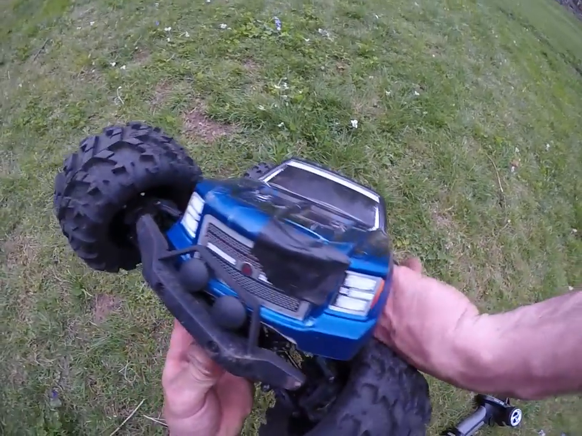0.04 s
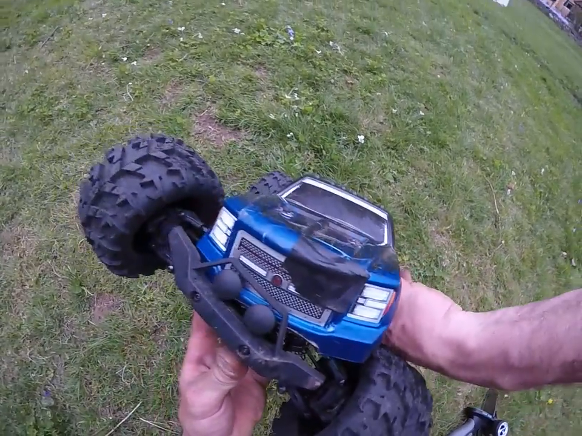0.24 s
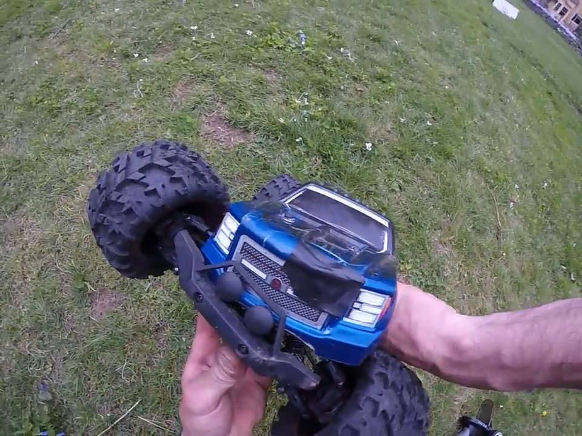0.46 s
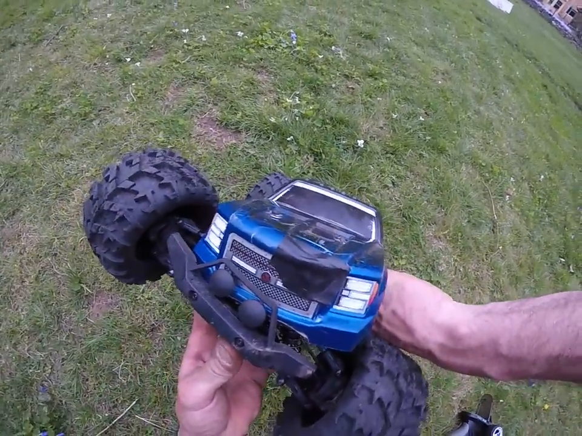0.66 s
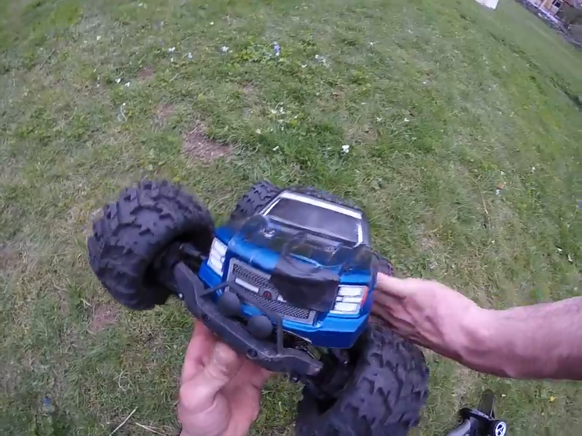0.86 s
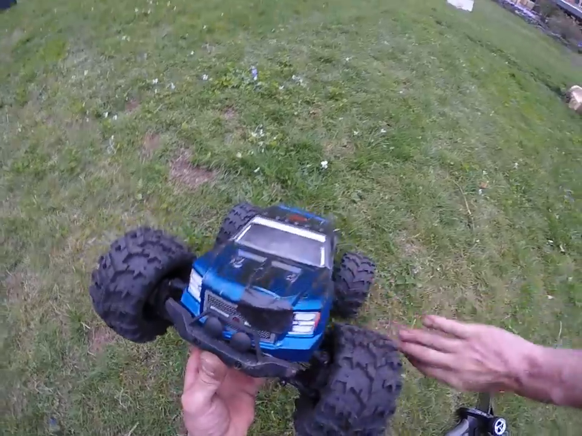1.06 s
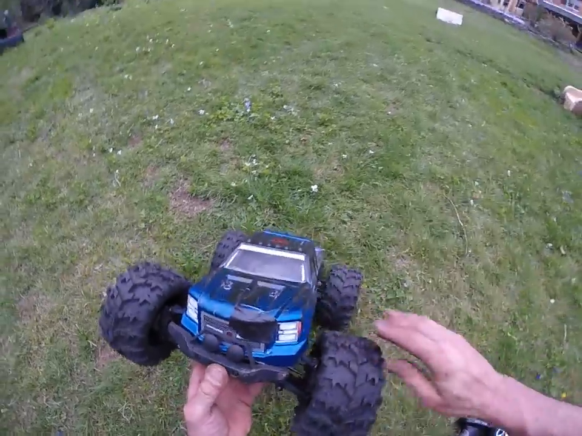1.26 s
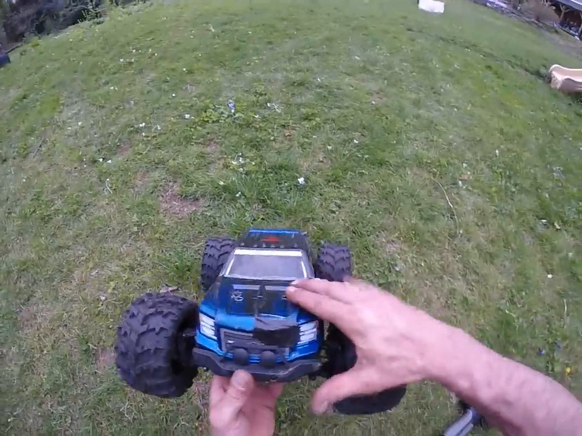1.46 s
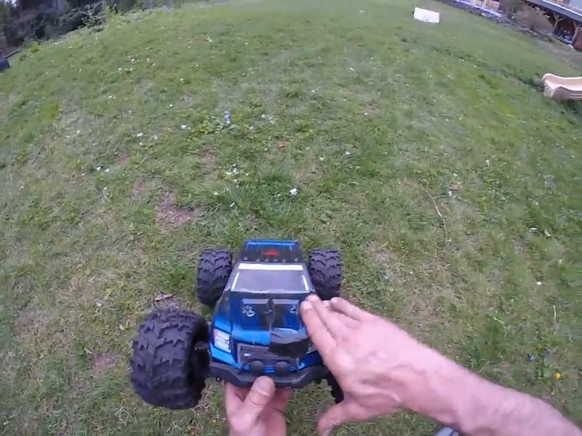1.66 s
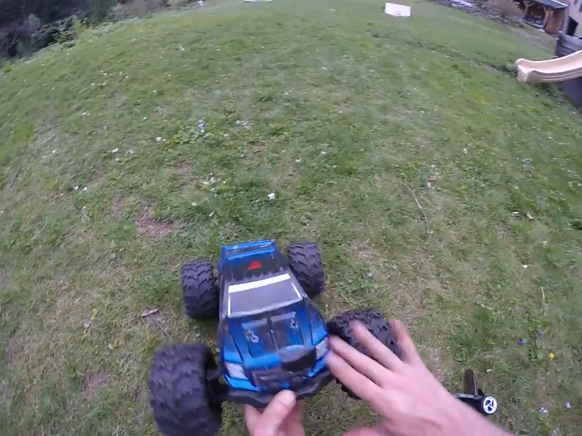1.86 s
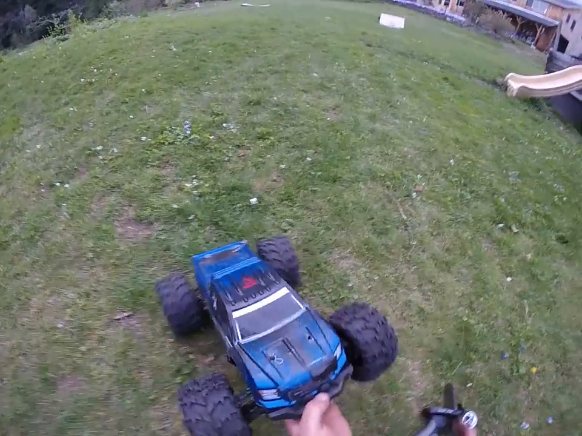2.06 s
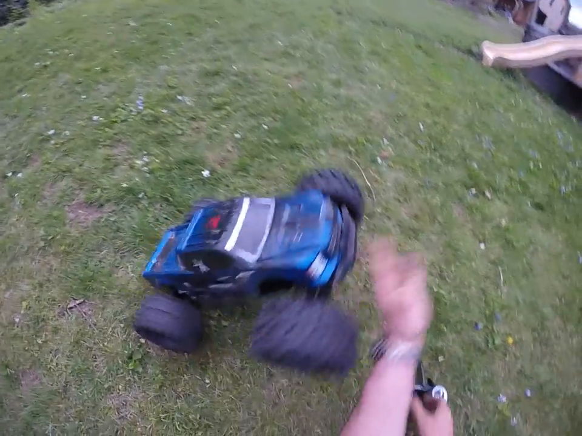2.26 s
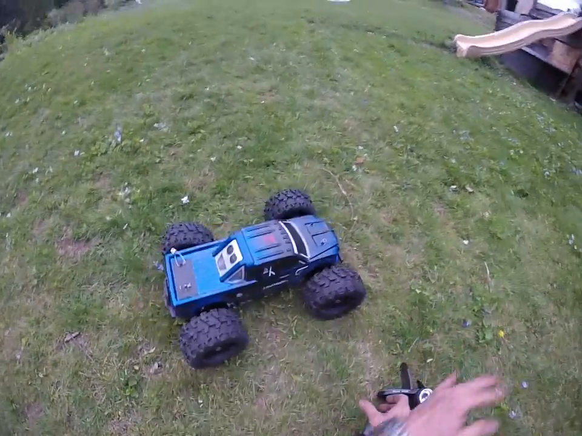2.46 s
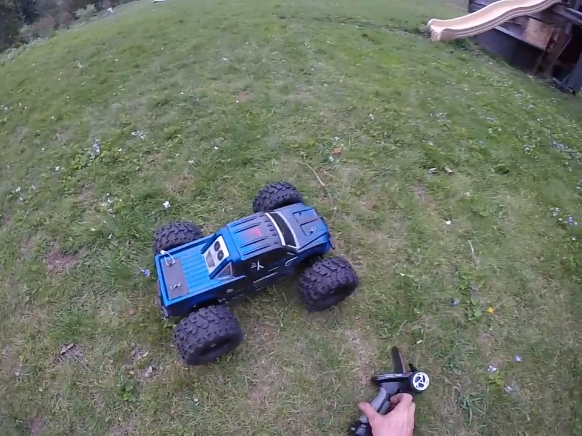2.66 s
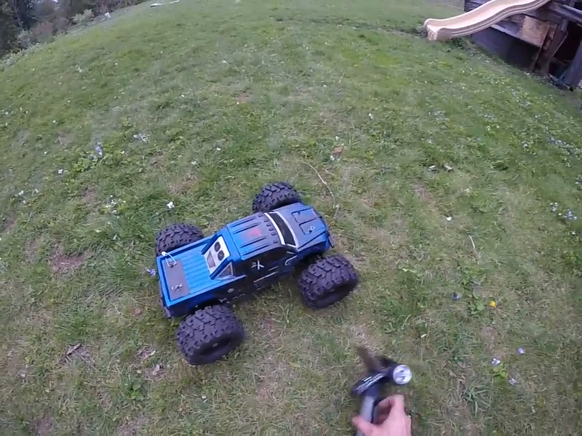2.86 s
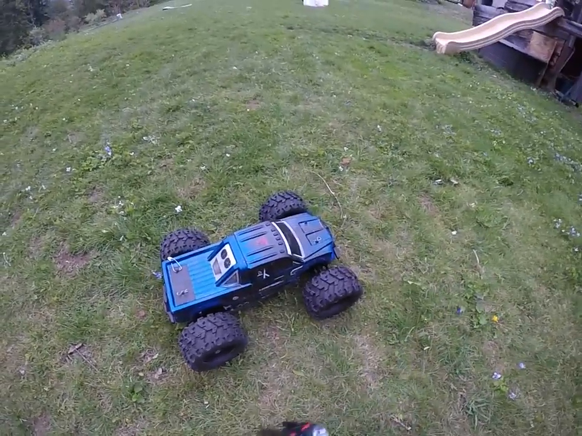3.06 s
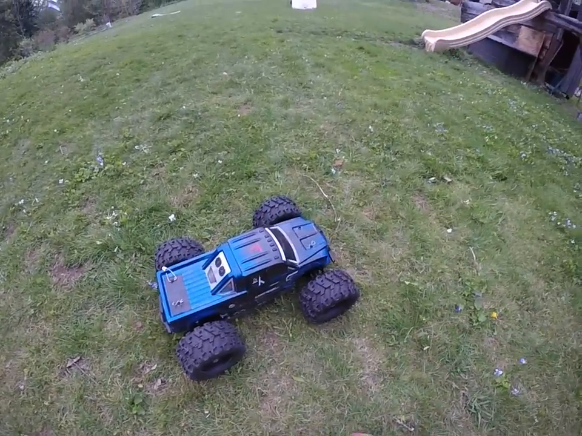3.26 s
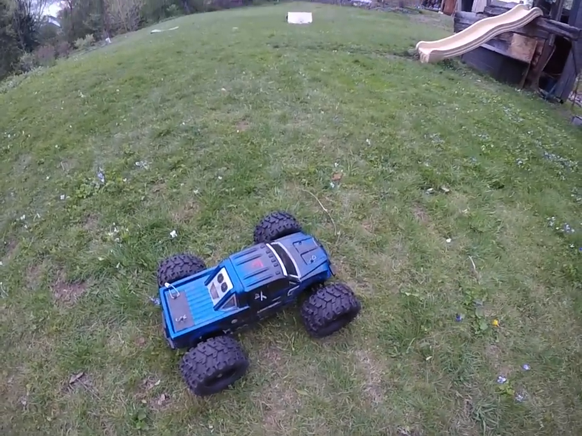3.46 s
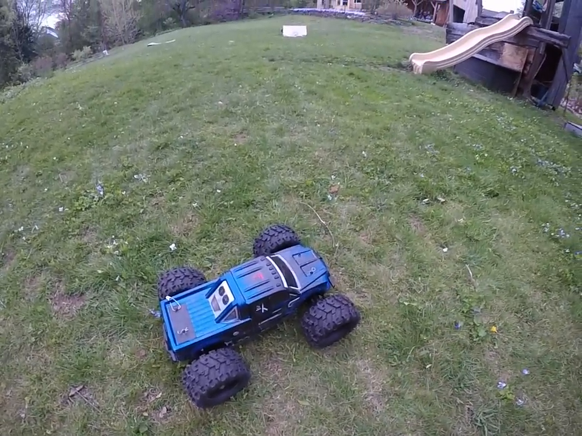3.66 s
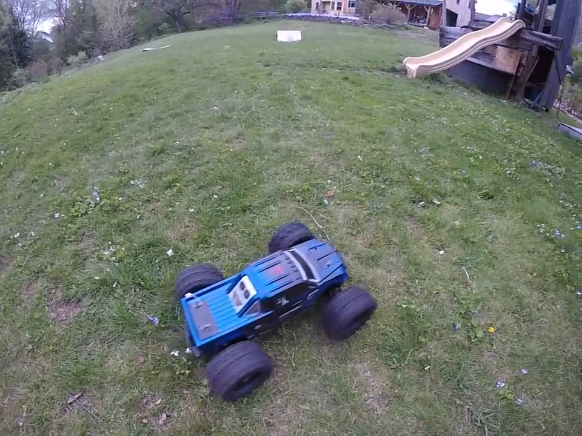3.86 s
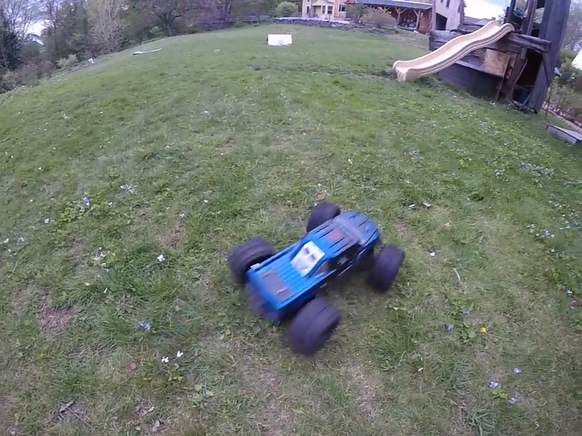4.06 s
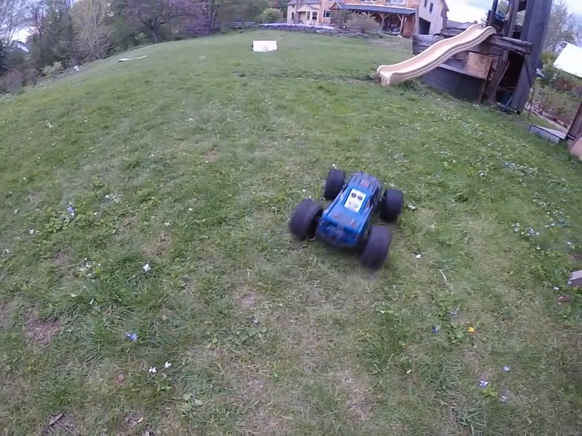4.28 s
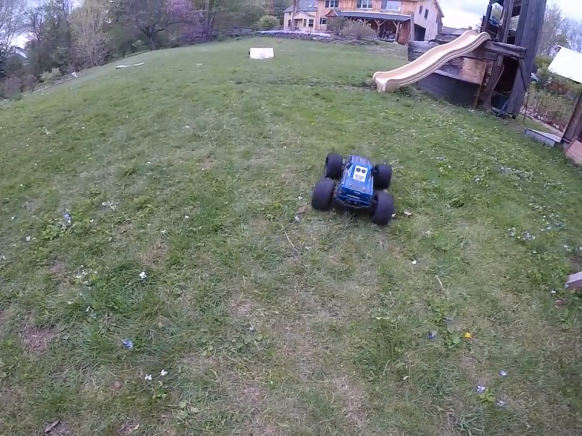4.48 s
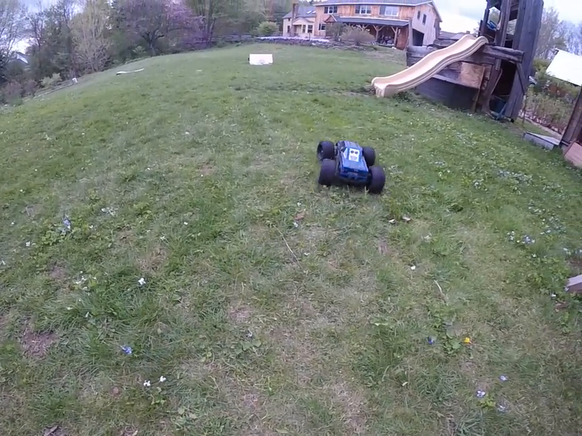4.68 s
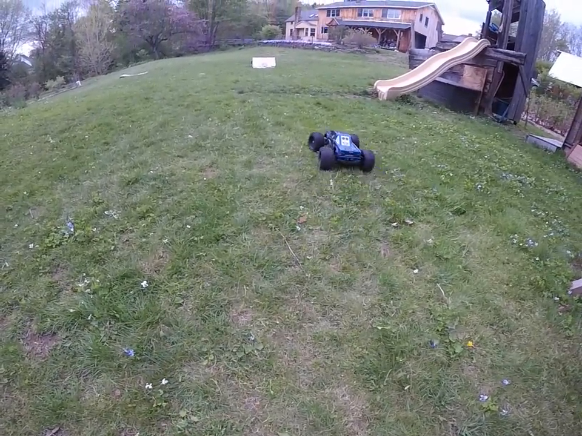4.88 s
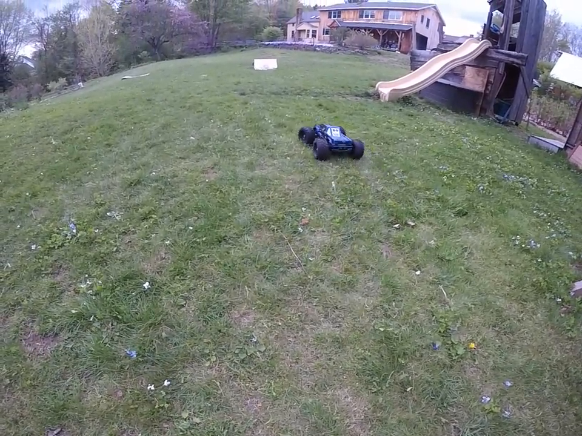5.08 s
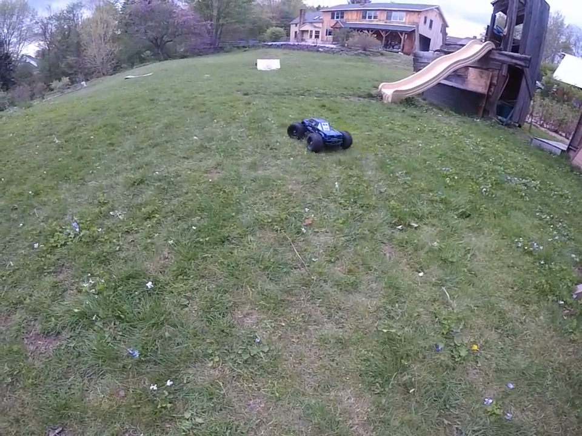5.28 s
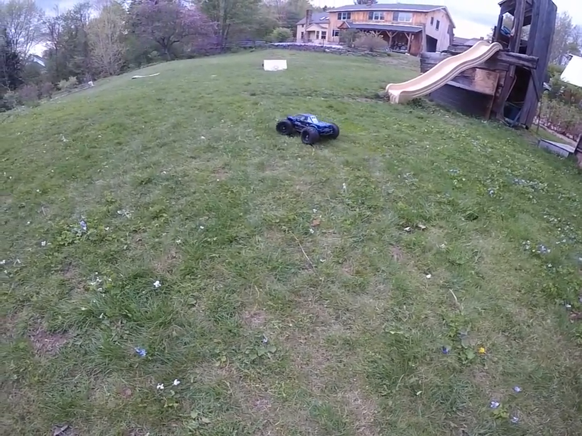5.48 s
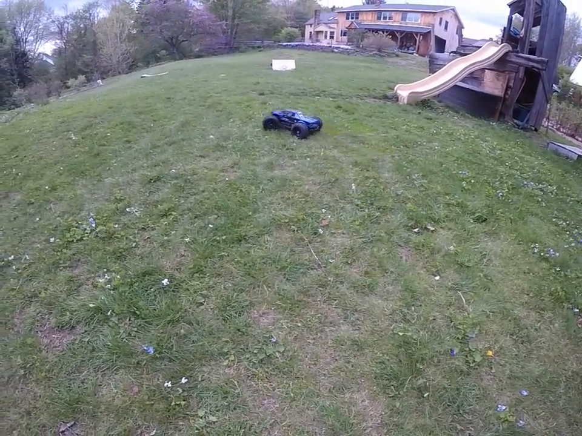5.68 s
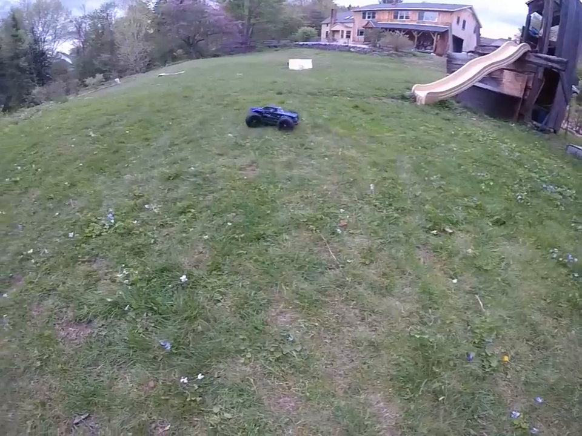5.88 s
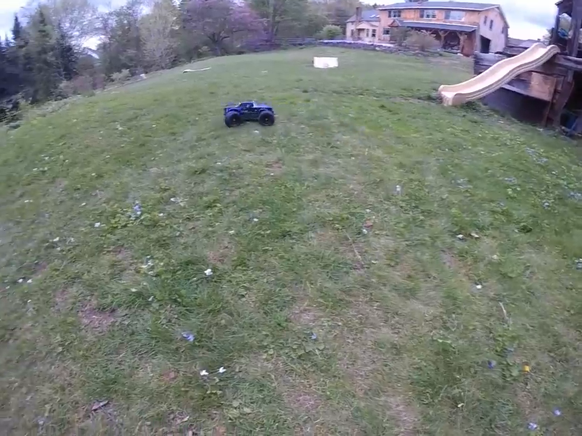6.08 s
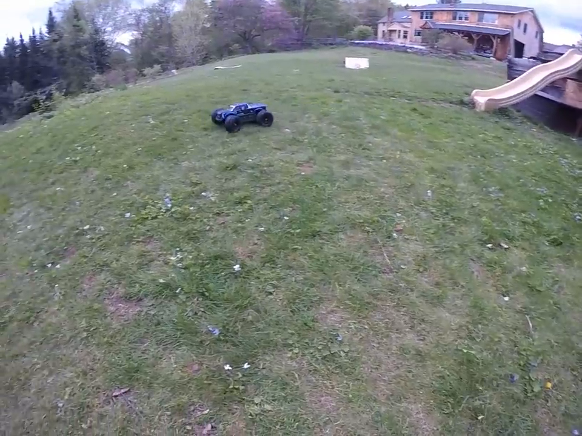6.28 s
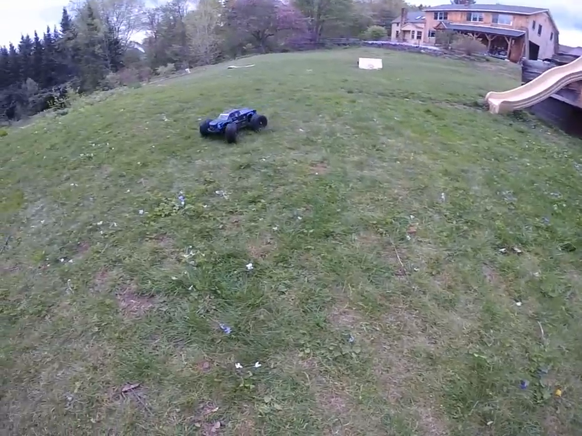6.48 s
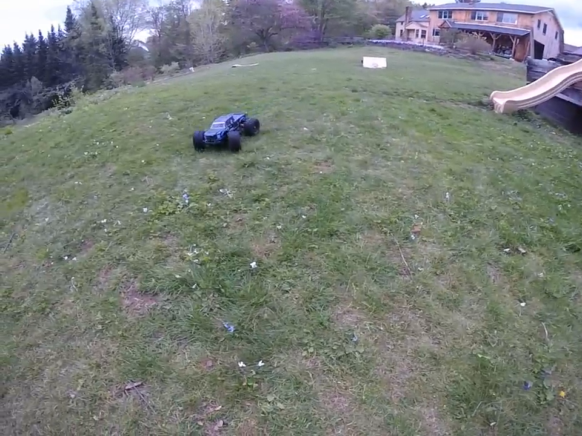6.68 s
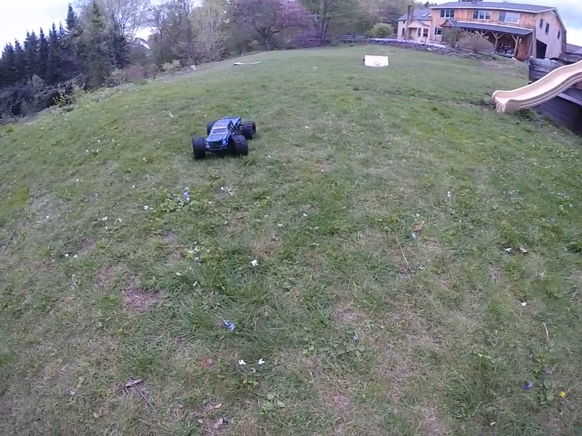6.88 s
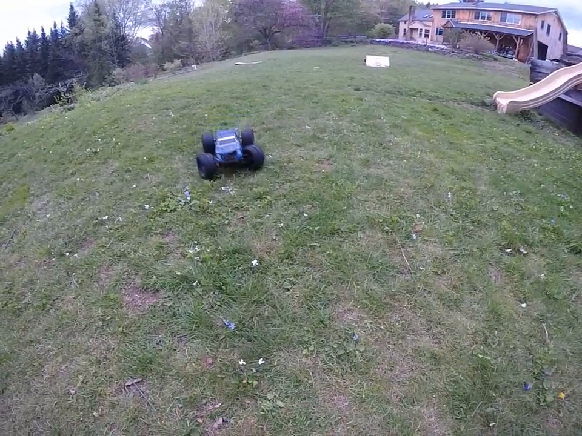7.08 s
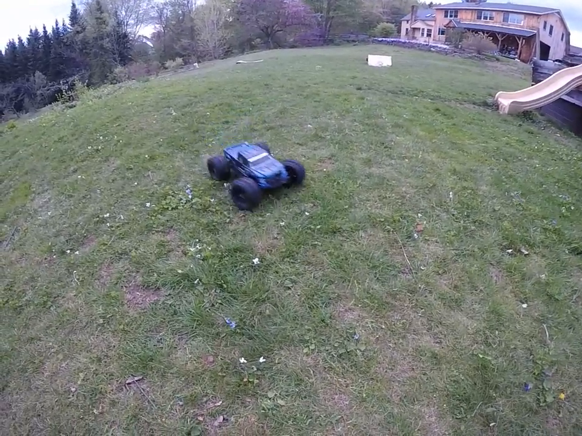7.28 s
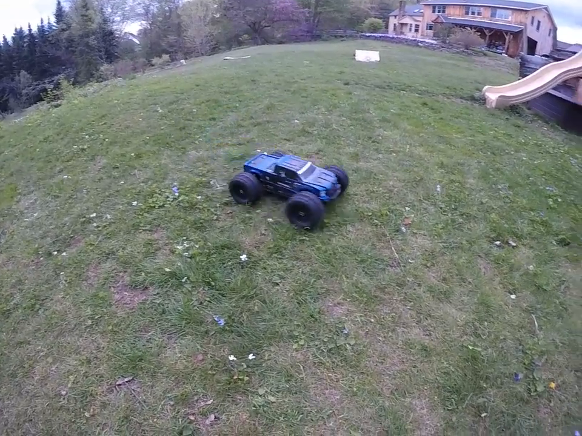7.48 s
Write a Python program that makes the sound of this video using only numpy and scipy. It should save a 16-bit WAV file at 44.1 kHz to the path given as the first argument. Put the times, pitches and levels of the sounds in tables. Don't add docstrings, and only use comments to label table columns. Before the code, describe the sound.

Hands turn a plastic model truck with clicks and knocks, drop it on grass, then its electric motor whines away in rough bursts.

```python
import sys
import numpy as np
from scipy import signal
from scipy.fft import rfft, irfft
from scipy.io import wavfile
from scipy.ndimage import uniform_filter1d

SR = 44100
rng = np.random.default_rng(int(sys.argv[2]) if len(sys.argv) > 2 else 0)


def bounce(signal):
    frames = np.transpose(np.atleast_2d(signal))
    limited = np.clip(frames, -1, 1)
    pcm = np.round(limited * 32767).astype(np.int16)
    wavfile.write(sys.argv[1], SR, pcm)


def volts_from_decibels(level):
    exponent = np.asarray(level, float) / 20
    return 10 ** exponent


N = 332514
T = np.arange(N) / SR

# (frequency [Hz], width [Hz], level [dB])
SHELL = [(573, 118, 4.5), (1280, 230, -11.5), (1673, 120, -1), (1784, 75, 2), (2263, 55, -0.5)]
# (frequency [Hz], width [Hz], level [dB])
RUSTLE = [(3310, 490, 29), (4070, 390, 26.5), (6050, 520, 25), (6620, 1170, 16.5)]


def level(x, db=0):
    return x * volts_from_decibels(db) / np.sqrt(np.mean(x ** 2))


def band(x, hz, width):
    return signal.lfilter(*signal.iirpeak(hz, hz / width, fs=SR), x)


def steep_band(x, hz, width):
    return band(band(x, hz, width), hz, width)


def walk(rate):
    hold = int(SR / rate)
    steps = np.repeat(rng.standard_normal(N // hold + 1), hold)
    return 1.4 * uniform_filter1d(uniform_filter1d(steps, hold), hold)[:N]


def grit(spread_db, share=0.037):
    noise = rng.standard_normal(N)
    grain_db = spread_db * np.minimum(rng.exponential(size=N), 4.5)
    return noise * volts_from_decibels(grain_db * (rng.random(N) < share))


def body(x, peaks, broad_hz, broad_width, broad_db):
    rings = sum(volts_from_decibels(db) * band(x, hz, width) for hz, width, db in peaks)
    return level(rings + volts_from_decibels(broad_db) * band(x, broad_hz, broad_width))


def read(table, fade=0.002):
    s, *columns = np.transpose(table)
    gate = np.clip(np.minimum(T - s[0], s[-1] - T) / fade, 0, 1)
    return [gate] + [np.interp(T, s, column) for column in columns]


def whine(hz, orders, wobble, patchy_db, throb_rate, rough):
    phase = 2 * np.pi * np.cumsum(hz * (1 + wobble * walk(90))) / SR
    tone = 0
    for k, db in orders:
        swell = volts_from_decibels(db + patchy_db * np.minimum(walk(throb_rate), .6))
        rasp = rough * np.sqrt(k) * walk(330)
        tone = tone + swell * np.sqrt(2) * np.sin(k * phase + rasp)
    return tone, phase


def hits(rows, t60, rise, snap, ring_hz, knock_hz=(620, 980), thump_hz=225, thump_width=185, crack_share=0.43):
    length = 4096
    out, t = np.zeros(N + length), np.arange(length) / SR

    def burst(noise, t60, rise):
        return noise * (1 - np.exp(-t / rise)) * 1000. ** (-t / t60)

    noises = rng.standard_normal((len(rows), 4, length))
    for (s, crack_db, hz, ring_db, knock_db, thump_db), noise in zip(rows, noises):
        contact = burst(noise[0], crack_share * t60, rise)
        contact[8] += snap
        crack = steep_band(contact, hz, 1800)
        crack = crack + .15 * steep_band(contact, 4800, 5000) + .3 * steep_band(contact, 6500, 2400)
        shell = burst(noise[1], t60, 2 * rise)
        ring = sum(steep_band(shell, f, 280) for f in ring_hz)
        chassis = burst(noise[2], t60, 0.0055)
        knock = sum(steep_band(chassis, f, 380) for f in knock_hz)
        thump = steep_band(burst(noise[3], 6.4 * t60, 0.0099), thump_hz, thump_width)
        i = int(s * SR)
        for part, db in ((crack, crack_db), (ring, ring_db), (knock, knock_db), (thump, thump_db)):
            out[i:i + length] += part * volts_from_decibels(db) / np.abs(part).max()
    return out[:N]


def motor():
    # (time [s], whine [Hz], level of its 1st, 2nd and 3rd multiple [dB])
    launch = [
        [(3.95, 414, -34.5, -52, -33), (3.972, 456.4, -24.5, -49, -42), (3.976, 470.4, -31.5, -36, -43),
         (3.996, 515, -42, -35, -35), (4.006, 539, -52, -39, -32), (4.018, 608, -33, -24, -31),
         (4.026, 603, -35, -27, -24), (4.045, 667, -46, -21.5, -26)],
        [(4.052, 652, -25.5, -25, -36), (4.062, 624, -23, -29, -22), (4.078, 617.5, -23, -22, -32),
         (4.09, 600, -27, -26.5, -30), (4.104, 675, -38, -26, -23.5), (4.12, 775, -50, -17.5, -37),
         (4.13, 769, -29, -20, -47), (4.14, 759, -33, -30, -36)],
        [(4.147, 767, -31.5, -20, -28), (4.159, 776, -31, -20, -44), (4.171, 788, -55, -17.5, -51),
         (4.183, 754, -35.5, -22.5, -40), (4.195, 770, -42, -35, -56), (4.211, 868, -61, -24, -54),
         (4.227, 799, -42, -33, -55), (4.24, 760, -55, -25, -57)],
    ]
    blips = [
        [(4.515, 561.1, -60, -52, -39), (4.521, 584, -48, -53, -37), (4.541, 661, -49, -55, -38),
         (4.553, 666.5, -31.5, -46, -40), (4.561, 641, -43, -52, -34), (4.569, 664.5, -33, -55, -35),
         (4.581, 658, -45, -46, -30.5), (4.61, 585, -45, -52, -40)],
        [(4.62, 636, -43, -63, -45), (4.63, 622, -34, -54, -31.5), (4.648, 665, -50, -57, -38),
         (4.662, 682, -46, -37, -42), (4.674, 667, -59, -50, -47), (4.704, 533, -56, -63, -63.5),
         (4.716, 550, -47, -79, -53), (4.725, 537.8, -49, -68, -56)],
        [(5.185, 488, -62, -65, -60), (5.189, 494.4, -62, -58, -59), (5.225, 465.5, -33, -46, -50),
         (5.249, 529, -53, -44, -43), (5.269, 565, -41, -53, -45), (5.301, 532, -57, -48, -44),
         (5.319, 525, -42.5, -51, -54), (5.345, 590, -69, -66, -56)],
    ]
    pull = [
        [(5.548, 559.4, -43, -64, -50), (5.572, 565.4, -42.5, -49, -44), (5.6, 573.5, -29, -46, -32.5),
         (5.61, 583, -36, -61, -40), (5.618, 634.5, -31, -54, -57), (5.626, 633.5, -28.5, -47, -52),
         (5.648, 568.4, -38, -64, -28.5), (5.655, 598, -37, -56, -48)],
        [(5.663, 638, -32.5, -43, -54), (5.677, 726, -42, -35, -31), (5.689, 752, -46, -33, -46),
         (5.705, 762.6, -45, -46, -32.5), (5.719, 748, -36, -36, -38), (5.745, 727, -50, -42, -41),
         (5.755, 690, -39, -42, -58), (5.765, 665, -25, -55, -48)],
        [(5.773, 593, -34, -53, -41), (5.787, 667.5, -34, -57, -35), (5.799, 709, -41, -45, -55),
         (5.819, 769, -45, -34.5, -54), (5.843, 771, -44, -32, -50), (5.853, 837, -50, -36, -58),
         (5.86, 871, -38, -40, -46)],
    ]
    climb = [
        [(5.868, 952, -52, -33, -43), (5.892, 999, -45, -53, -51), (5.898, 1042, -56, -36, -45),
         (5.908, 1068, -54, -33, -51), (5.918, 1006, -33, -34, -47), (5.926, 975, -38, -43, -32),
         (5.932, 996, -44, -33.5, -68), (5.95, 1074, -29, -43, -32.5)],
        [(5.958, 1157, -34, -36, -49), (5.97, 1251, -35, -47, -39), (5.982, 1208, -46, -54, -38.5),
         (6.0, 1168, -29, -33, -43), (6.01, 1325, -40, -59, -63), (6.02, 1437, -35.5, -51, -35.5),
         (6.03, 1216, -34, -53, -68), (6.038, 1122, -44, -57, -79)],
    ]
    back = [
        [(6.975, 447.2, -62, -49, -59), (6.999, 439.6, -40, -47, -45), (7.011, 522.7, -41, -65, -43),
         (7.025, 641, -40, -46, -31), (7.037, 686, -45, -37, -31), (7.055, 665, -59, -42, -32),
         (7.073, 639, -44, -56, -27.5), (7.095, 640, -40, -48, -30)],
        [(7.102, 644, -47, -51, -27), (7.116, 698, -44, -32, -31), (7.146, 677.4, -58, -50, -54),
         (7.16, 658, -55, -53, -28.5), (7.186, 665.5, -61, -38, -38), (7.198, 672, -32, -35, -41),
         (7.226, 648, -74, -58, -28.5), (7.235, 671, -45, -47, -37)],
        [(7.245, 665, -42, -41, -57), (7.263, 656, -62, -38, -38), (7.277, 657, -41.5, -52, -40),
         (7.303, 662, -41.5, -56, -35.5), (7.323, 672.5, -46, -40, -48), (7.341, 622, -55, -63, -63),
         (7.353, 663, -44, -46, -45), (7.365, 675, -46, -55, -50)],
    ]
    # (time [s], depth [3.6 dB steps])
    slips = [(4.067, 3), (4.14, 0), (4.218, 7), (4.608, -0.5), (5.66, 1), (5.889, -3), (7.058, 2.5),
             (7.097, 1.5), (7.143, -5), (7.198, 3), (7.27, 1)]
    bursts = [launch, blips[:2], blips[2:], pull + climb, back]
    gear_dbs = (-38, -39.5, -42.5, -42.5, -41.5)
    gear_follows = 0.36
    fourth_hzs, fourth_dbs, fourth_hz_per_db = (2020, 2280, 2170, 2300, 2120), (10.5, 0.5, -13, -2.5, 0), 17
    hiss = body(grit(1.7, share=0.045), RUSTLE, 3700, 1800, -1.5)
    buzz = body(grit(1.8), SHELL, 1420, 840, -1.0)
    out = 0
    for surges, gear_db, fourth_hz, fourth_db in zip(bursts, gear_dbs, fourth_hzs, fourth_dbs):
        gate, hz, *dbs = read(sum(surges, []), 0.0026)
        load_db = np.max(dbs, axis=0)
        hiss_db = gear_db + gear_follows * (load_db - load_db.max())
        lift_db = fourth_db - np.abs(4 * hz - fourth_hz) / fourth_hz_per_db
        lower = list(enumerate(dbs, 1)) + [(4, load_db + lift_db)]
        upper = [(5, hiss_db - 0.5 - np.abs(5 * hz - 3230) / 60),
                 (7, hiss_db - 7.0 - np.abs(7 * hz - 4400) / 70)]
        tone, phase = whine(hz, lower, wobble=.008, patchy_db=2.8, throb_rate=130, rough=.4)
        tone = tone + whine(hz, upper, wobble=.03, patchy_db=8, throb_rate=90, rough=.7)[0]
        gears = volts_from_decibels(hiss_db - 5.5 + 2.5 * np.minimum(walk(46), 1)) * hiss
        gears = gears + volts_from_decibels(hiss_db + 2.5 + 0.9 * walk(65)) * buzz
        out = out + gate * (volts_from_decibels(1.0) * tone + gears * (1 + 0.73 * np.cos(phase)))
    dip_db = sum(3.6 * db * np.exp(-((T - s) / 0.0032) ** 2) for s, db in slips)
    return out * volts_from_decibels(-dip_db)


def controller():
    # (start [s], end [s], level [dB])
    switching = [
        (3.737, 4.24, -50),
        (4.495, 4.72, -52),
        (5.172, 5.33, -56),
        (5.535, 5.845, -50),
        (5.845, 5.945, -58),
        (5.945, 6.06, -49),
        (6.92, 7.37, -59),
    ]
    switching_hz = 8048
    out = 0
    for start, end, db in switching:
        gate, db = read([(start, db), (end, db)], 0.0021)
        swell = volts_from_decibels(db + 3 * np.minimum(walk(30), .5))
        out = out + gate * swell * np.sqrt(2) * np.sin(2 * np.pi * switching_hz * T + .9 * walk(60))
    return out


def jerks():
    # (time [s], chassis ring [dB], knock [dB])
    kicks = [(3.7404, -22, -24.5), (3.7738, -29, -29.5), (3.8025, -26.5, -31), (3.8383, -16.5, -20),
             (3.863, -19.5, -29), (3.906, -13, -22.5), (3.928, -15, -20), (3.95, -14, -24.5),
             (3.966, -19, -31), (4.2249, -21, -35.5), (4.521, -20, -33), (5.1874, -51, -34),
             (6.049, -31.5, -30.5), (6.941, -23.5, -39)]
    rows = [(s, db - 13, 3600, db, knock_db, knock_db - 20) for s, db, knock_db in kicks]
    return hits(rows, t60=0.038, rise=0.0011, snap=.1, ring_hz=(1300, 1600, 1950), knock_hz=(400, 620))


def gear_teeth():
    # (time [s], crack peak [dB])
    backlash = [(3.739, -32), (3.8287, -17.5), (3.898, -23.5), (3.93, -24), (4.009, -27), (4.2917, -18.5),
                (4.375, -19.5), (4.465, -23), (4.5144, -20), (4.547, -24), (5.174, -28.5), (5.535, -28),
                (5.548, -23), (6.9238, -25), (6.936, -23.5), (6.992, -35), (7.04, -22), (7.417, -24.5),
                (7.5166, -26)]
    # (time [s], crack peak [dB])
    coasting = [(4.318, -24), (4.393, -29), (4.7184, -25), (4.738, -20), (4.817, -26.5), (4.8389, -23.5),
                (4.851, -28.5), (4.928, -31), (4.951, -29), (5.0729, -24.5), (5.102, -34), (5.187, -27.5),
                (5.4744, -30.5), (5.497, -29), (6.119, -27), (6.0964, -36), (6.184, -26.5), (6.251, -23.5),
                (6.338, -31), (6.355, -25.5), (6.392, -39), (6.4267, -35), (6.446, -29.5), (6.541, -29.5),
                (6.56, -27), (6.6816, -34.5), (6.698, -29.5), (6.7252, -37), (6.8466, -31.5), (7.3774, -31)]
    # (time [s], crack peak [dB])
    skips = [(3.784, -25), (3.8136, -33), (4.126, -31), (4.199, -28), (4.631, -38), (5.6481, -32),
             (5.8372, -38), (6.049, -29), (6.135, -36), (7.239, -37), (7.324, -35), (7.353, -39)]
    teeth = [(s, db, db - 12) for s, db in backlash]
    teeth += [(s, db, db - 19) for s, db in coasting + skips]
    tooth_hz = 3600 * (1 + 0.039 * rng.standard_normal(len(teeth)))
    tooth_hz[-len(skips):] = 5750
    rows = [(s, db, hz, ring_db, ring_db - 4.5, -70) for (s, db, ring_db), hz in zip(teeth, tooth_hz)]
    return hits(rows, t60=0.1, rise=0.000057, snap=3.76, ring_hz=(1600, 1950, 2300), crack_share=.3)


def handling():
    # (time [s], crack peak [dB], crack [Hz], shell ring below the crack [dB])
    clicks = [
        (0.2971, -17.5, 3500, 6),
        (0.9388, -44, 3810, 4),
        (1.021, -37, 6780, -3),
        (1.1519, -23.5, 3700, 1.5),
        (1.2034, -31.5, 3440, 1),
        (1.573, -16, 4060, 22),
        (1.6882, -25.5, 3320, 9),
        (1.831, -31, 4800, 6),
        (2.5663, -21, 4950, 11),
        (2.594, -32, 5640, 9),
    ]
    # (time [s], crack peak [dB], knock [dB])
    taps = [(0.0484, -40, -31.5), (0.5764, -36, -36.5), (0.8346, -33, -33.5), (0.8634, -27, -34.5),
            (1.041, -14.5, -25), (1.0523, -23, -18.5), (1.062, -34, -28), (1.0979, -26.5, -25.5),
            (1.4572, -23.5, -21.5), (1.4766, -29, -29.5), (2.129, -41, -35)]
    # (time [s], crack peak [dB], crack [Hz], thump [dB])
    thuds = [
        (0.28, -24, 3460, -34),
        (1.0329, -18.5, 6000, -26.5),
        (1.4403, -26.5, 4560, -24),
        (2.4449, -34, 5500, -26.5),
        (2.4644, -23, 2640, -26),
        (2.4871, -12.5, 2780, -30),
        (2.528, -11, 5330, -26),
        (2.5478, -32, 2530, -46),
    ]
    # (time [s], peak [dB])
    ticks = [
        (2.632, -37),
        (2.7495, -50),
        (2.79, -43.5),
        (2.886, -41.5),
    ]
    rows = [(s, db, hz, db - ring_db, db - 23, db - 50) for s, db, hz, ring_db in clicks]
    rows += [(s, db, 3880, db - 7, knock_db, knock_db - 15.5) for s, db, knock_db in taps]
    rows += [(s, db, hz, db - 11, thump_db - 7.5, thump_db) for s, db, hz, thump_db in thuds]
    rows += [(s, db, 1700, db, db - 4, db - 10) for s, db in ticks]
    return hits(rows, t60=0.02, rise=0.0001, snap=4, ring_hz=(1600, 1900))


def steering_squeal():
    # (time [s], mesh frequency [Hz], level [dB])
    squeals = [
        [(2.325, 1444, -41), (2.338, 1567, -32), (2.375, 1650, -28.5), (2.386, 1670, -37), (2.393, 1300, -33),
         (2.41, 1260, -43)],
        [(2.42, 1336, -43), (2.445, 1770, -34.5), (2.468, 1880, -38), (2.48, 1558, -31.5), (2.53, 1760, -39)],
        [(7.42, 2190, -41), (7.44, 2230, -33.5), (7.485, 1490, -40)],
    ]
    # (multiple of the mesh frequency, level [dB])
    mesh_orders = [(1, -16), (2, -12), (3, 0), (4, -4.5), (5, -6), (6, -14)]
    out = 0
    for table, tone_db, hiss_db in zip(squeals, (-5, -10, -7), (-8, -5, -5)):
        gate, hz, db = read(table, 0.0013)
        tone, _ = whine(hz, mesh_orders, wobble=.016, patchy_db=4.5, throb_rate=200, rough=.9)
        hiss = level(steep_band(grit(2.5), 6500, 4700), hiss_db)
        out = out + gate * volts_from_decibels(db) * (volts_from_decibels(tone_db) * tone + hiss)
    return out


def creaks():
    # (time [s], length [s], frequency [Hz], width [Hz], level [dB])
    rubs = [
        (1.7, .06, 3100, 250, -56),
        (2.11, .13, 760, 150, -42),
        (2.09, .13, 4050, 300, -52),
        (2.1, .1, 3450, 250, -54),
        (4.23, .65, 1570, 160, -53),
        (6.0, .8, 2350, 130, -57),
        (6.26, .3, 3350, 120, -57),
        (6.0, .55, 640, 130, -53),
    ]
    out = 0
    for s, length, hz, width, db in rubs:
        swell = np.sin(np.pi * np.clip((T - s) / length, 0, 1))
        stutter = volts_from_decibels(4.0 * np.minimum(walk(50), 1))
        out = out + swell * stutter * level(steep_band(grit(2.8), hz, width), db)
    return out


def scuffing():
    # (time [s], level [dB])
    grips = [
        [(0, -45.5), (0.12, -47.5), (0.7, -50.5), (0.99, -44.5), (1.25, -52)],
        [(1.24, -53.5), (1.9, -52.5), (2.1, -46.5), (2.3, -47.5), (2.5, -39.5), (2.62, -52), (2.75, -66)],
    ]
    # (time [s], level [dB])
    rolling = [(2.74, -58.5), (3.68, -61.5), (3.8, -48.5), (4.0, -43), (4.27, -45), (4.8, -53),
               (5.05, -55.5), (5.4, -50.5), (5.5, -58), (5.8, -43.5), (6.3, -51), (6.88, -59), (7.1, -43),
               (7.4, -49.5), (7.54, -47.5)]
    grip = sum(gate * volts_from_decibels(db) for gate, db in map(read, grips))
    rolls, roll_db = read(rolling)
    flicker = walk(25)
    scuff = grip + rolls * volts_from_decibels(-54.5 + 2.15 * (roll_db + 50))
    scuff = scuff * volts_from_decibels(2.4 * flicker + 1.6 * walk(60)) * body(grit(1.0), SHELL, 1220, 1400, -5.0)
    rustle = grip * volts_from_decibels(-4.5) + rolls * volts_from_decibels(roll_db)
    rustle = rustle * volts_from_decibels(2.1 * flicker + 1.4 * walk(60)) * body(grit(5.8), RUSTLE, 3400, 3300, -25.0)
    return scuff + rustle


def birds():
    # (time [s], length [s], start frequency [Hz], end frequency [Hz], level [dB])
    calls = [
        (0.428, .035, 8400, 6960, -49),
        (0.971, 0.067, 8150, 7130, -45.5),
        (1.61, 0.028, 8300, 7060, -46),
        (3.289, 0.04, 4500, 3650, -45.5),
        (3.394, 0.041, 8600, 6100, -47.5),
        (5.015, 0.03, 8100, 6230, -45.5),
        (5.378, 0.07, 4580, 3720, -48.5),
        (6.488, 0.029, 7700, 6500, -43),
    ]
    out = np.zeros(N)
    for s, length, from_hz, to_hz, db in calls:
        u = np.clip((T - s) / length, 0, 1)
        phase = 2 * np.pi * np.cumsum(from_hz + (to_hz - from_hz) * u) / SR
        out += volts_from_decibels(db) * np.sqrt(np.sin(np.pi * u)) * np.sin(phase)
    t = T[:SR // 4]
    trees = rng.standard_normal(len(t)) * 1000. ** (-t / 0.44) * np.minimum(t / 0.011, 1)
    return out + volts_from_decibels(-32) * signal.fftconvolve(out, trees)[:N]


def wind_bumps():
    # (time [s], thump peak [dB])
    puffs = [
        (6.04, -31),
        (6.107, -32.5),
        (6.158, -33),
        (6.217, -47),
        (6.278, -43),
        (6.351, -36),
        (6.41, -37.5),
        (6.521, -42),
    ]
    rows = [(s, -90, 3600, -90, db - 12, db) for s, db in puffs]
    return hits(rows, t60=0.022, rise=0.001, snap=.1, ring_hz=(1600,), knock_hz=(400, 640),
                thump_hz=155, thump_width=64)


def wind_rumble():
    # (time [s], level [dB])
    wind = [(0, -46), (0.6, -61), (0.8, -51.5), (1.7, -51.5), (2.17, -40.5), (2.5, -53), (2.64, -51.5),
            (3.68, -53), (4.0, -37), (4.42, -46.5), (5.05, -50.5), (5.65, -45.5), (6.15, -43), (6.4, -47.5),
            (6.88, -49.5), (7.54, -42.5)]
    both, between = [level(band(n, 163, 64) + 0.69 * band(n, 258, 147) + 3.5 * band(n, 45, 29))
                     for n in rng.standard_normal((2, N))]
    sides = np.array([[1], [-1]])
    return volts_from_decibels(read(wind)[1] + 0.45 * walk(22)) * (both + 0.42 * between * sides)


def gust():
    peak_s, length_s = 6.3, 0.61
    noise = level(steep_band(rng.standard_normal(N), 55, 60), -69)
    return noise * np.exp(-((T - peak_s) / length_s) ** 2) * volts_from_decibels(3 * walk(14))


def air():
    # (frequency [Hz], density [dB per Hz])
    mid_spectrum = [(12, -53), (20, -15.5), (106, -30.5), (140, -0.5), (169, -1.5), (287, -10), (529, -19),
                    (802, -20.5), (2300, -18.5), (3120, -25.5), (3900, -23.5), (10600, -29.5),
                    (15200, -109)]
    # (frequency [Hz], density [dB per Hz])
    side_spectrum = [(12, -67), (20, -39), (106, -29), (152, -3.5), (473, -6.5), (1560, -11), (2240, -19.5),
                     (3300, -35), (4360, -26), (10300, -29), (15200, -45)]
    # (frequency [Hz], width [Hz], level [dB])
    camera_tones = [
        (10476, 110, -65),
        (13528, 110, -78),
    ]
    log_f = np.log(np.maximum(np.fft.rfftfreq(N, 1 / SR), 1))

    def hiss(spectrum, db):
        hz, density_db = np.transpose(spectrum)
        gain = volts_from_decibels(np.interp(log_f, np.log(hz), density_db))
        return level(irfft(rfft(rng.standard_normal(N)) * gain, N), db)

    mid, side = hiss(mid_spectrum, -52), hiss(side_spectrum, -47)
    mid = mid + sum(level(band(rng.standard_normal(N), hz, width), db) for hz, width, db in camera_tones)
    return volts_from_decibels(0.093 * walk(3.44)) * np.array([mid + side, mid - side])


def ports(x):
    # (frequency [Hz], close: left minus right [dB], left lead [rad], further out left: the same [dB], [rad])
    differences = [(200, 0, -.1, -1, -.3), (650, -3, -.5, -2.5, -.1), (950, -11, -.3, -2, 1.2),
                   (1100, -8, 1.5, 3, 2.3), (1450, -2, 1.6, 6, .9), (1950, -1, 1.4, 11, .8),
                   (2400, 5, 3.3, 6, -.9), (2900, -4, 6.4, 0, 0), (5200, -1.5, 6.2, .6, .3),
                   (6800, 0, 7.0, 0, 1.3), (8050, -2, 8.4, 3, 2.5), (10000, 0, 12.5, 0, 6.3)]
    turn_s = 4.27
    hz, *columns = np.transpose(differences)
    f = np.fft.rfftfreq(N, 1 / SR)
    db_near, rad_near, db_far, rad_far = (np.interp(f, hz, column) for column in columns)
    far = np.clip((T - turn_s) / 0.027, 0, 1)
    out = 0
    for share, db, rad in ((1 - far, db_near, rad_near), (far, db_far, rad_far)):
        right = rfft(share * x) * volts_from_decibels(-db / 2)
        left = right * volts_from_decibels(db) * np.exp(1j * rad)
        out = out + irfft(np.array([left, right]), N)
    return out


def lawn(x):
    t = T[:4096]
    tails = rng.standard_normal((2, len(t))) * 1000. ** (-t / 0.017) * np.minimum(t / 0.0028, 1)
    return volts_from_decibels(-15.5) * signal.fftconvolve(band(x, 6700, 12600)[None], tails, axes=1)[:, :N]


def scene():
    knocks, clatter = handling(), gear_teeth()
    near = motor() + controller() + jerks() + clatter + knocks
    near = near + steering_squeal() + creaks() + scuffing() + birds() + wind_bumps()
    near = signal.sosfilt(signal.butter(3, 8600, fs=SR, output="sos"), near)
    near = near + steep_band(knocks + .5 * clatter, 13000, 3000)
    wind_filter = signal.ellip(6, .5, 28, 130, "high", fs=SR, output="sos")
    return signal.sosfilt(wind_filter, ports(near) + lawn(near) + wind_rumble()) + air() + gust()


def low_pass(x):
    return signal.sosfilt(signal.butter(12, 16480, fs=SR, output="sos"), x)


def record(dry):
    top_hz = 15300
    mix = signal.sosfilt(signal.ellip(8, .2, 60, top_hz, fs=SR, output="sos"), dry)
    return low_pass(mix)


dry = scene()
out = record(dry)
bounce(out)
```